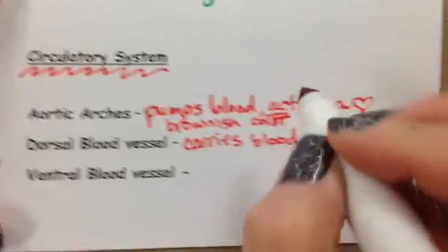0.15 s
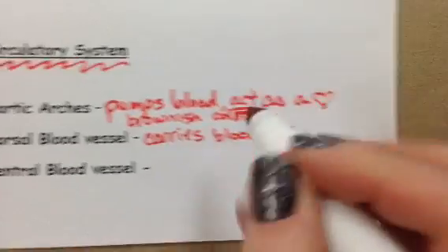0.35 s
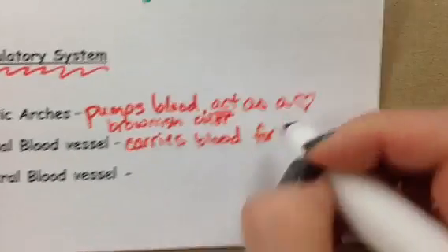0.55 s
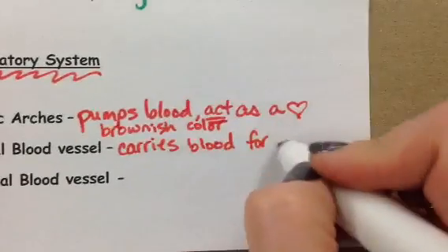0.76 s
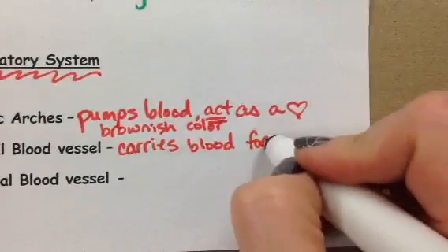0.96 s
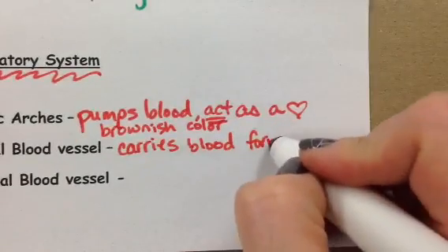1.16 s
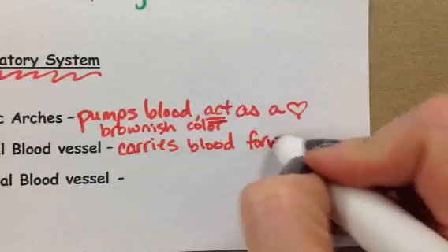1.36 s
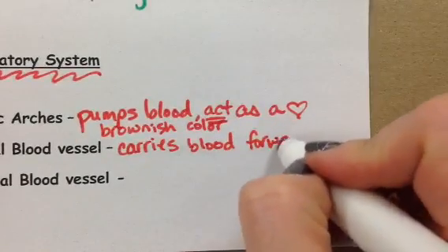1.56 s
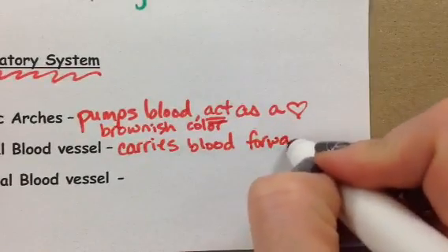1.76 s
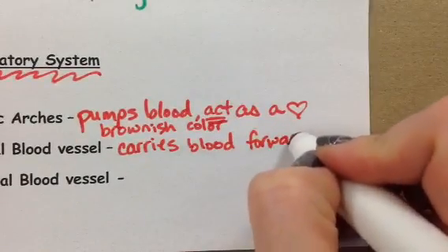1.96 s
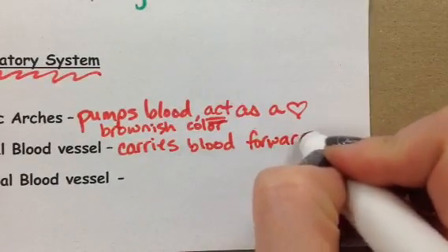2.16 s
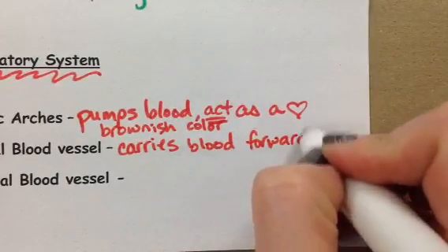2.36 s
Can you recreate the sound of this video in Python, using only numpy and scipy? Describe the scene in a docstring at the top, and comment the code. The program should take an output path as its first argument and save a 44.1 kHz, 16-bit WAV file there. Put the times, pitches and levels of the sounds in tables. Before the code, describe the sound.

Marker writing on paper, softly scratchy and chattering, following a swish of the shifted sheet.

```python
"""A felt marker writes on a sheet of paper on a desk, close to a mono microphone in a quiet room.
Its nib hisses over the fibres where it moves fast and chatters at the pen's own resonance where it
lands, turns or stops. Before the writing, a hand shifts the sheet in one long, two-part swish; the
paper ticks, drums and catches, and a finger taps the desk. Ventilation and a faint hum lie beneath."""
import sys
import numpy as np
from scipy import signal
from scipy.fft import rfft, irfft
from scipy.io import wavfile
from scipy.ndimage import uniform_filter1d

SR = 44100
rng = np.random.default_rng(int(sys.argv[2]) if len(sys.argv) > 2 else 0)


def pcm_store(signal):
    """Save signal as 16-bit PCM."""
    levels = np.round(np.clip(np.atleast_2d(signal), -1, 1) * 32767)
    wavfile.write(sys.argv[1], SR, levels.astype(np.int16).T)


N = 110250
TIME = np.arange(N) / SR


def undb(db):
    """Decibels to gain."""
    return 10 ** (np.asarray(db) / 20)


def unit(x):
    """Scale to rms 1."""
    return x / np.sqrt(np.mean(x ** 2) + 1e-20)


def drift(rate_hz):
    """Smooth random modulation with a spread near 1."""
    hold = max(int(SR / rate_hz), 2)
    steps = rng.standard_normal(N)[np.arange(N) // hold]
    return 1.33 * uniform_filter1d(uniform_filter1d(steps, hold), hold)


def eq(x, curve, modes=(), size=2048):
    """Minimum-phase EQ from a curve (f/Hz, level/dB) plus resonances (f/Hz, width/Hz, level/dB)."""
    f = np.fft.rfftfreq(size, 1 / SR) + 1
    curve_hz, curve_db = np.array(curve).T
    db = np.interp(np.log(f), np.log(curve_hz), curve_db)
    for hz, width, peak in modes:
        db += peak / (1 + (2 * (f - hz) / width) ** 2)
    cepstrum = irfft(np.log(undb(db)))
    cepstrum[1:size // 2] *= 2
    cepstrum[size // 2 + 1:] = 0
    return signal.fftconvolve(x, irfft(np.exp(rfft(cepstrum))))[:N]


def butter(x, hz, kind, order=6):
    """Low-pass or high-pass."""
    return signal.sosfilt(signal.butter(order, hz, kind, fs=SR, output="sos"), x)


def bass(x, hz):
    """The band below hz, without delay."""
    forward = butter(x, hz, "low", order=3)
    return butter(forward[::-1], hz, "low", order=3)[::-1]


def grains(per_s=14000, spread_db=1.5):
    """Paper fibres snap free in dense, uneven clicks; the defaults are the sliding sheet's grain."""
    clicks = (rng.random(N) < per_s / SR) * rng.choice([-1, 1], N)
    return clicks * undb(spread_db * np.minimum(rng.exponential(size=N), 2 * np.e))


def gesture(start, length, rise_share=.29, fall_share=.3):
    """Envelope of one movement: it speeds up, holds and slows down."""
    progress = (TIME - start) / length
    ramp = np.minimum(progress / rise_share, (1 - progress) / fall_share)
    return np.sin(np.pi / 2 * np.clip(ramp, 0, 1))


def gestures(cues):
    """Envelope of a list of movements (t/s, length/s, level/dB)."""
    return sum(undb(db) * gesture(start, length) for start, length, db in cues)


def hits(cues, one_shot):
    """Trigger a peak-normalised one-shot at each cue (t/s, level/dB)."""
    triggers = np.zeros(N)
    for start, db in cues:
        triggers[int(start * SR)] += undb(db)
    return signal.fftconvolve(triggers, one_shot / np.abs(one_shot).max())[:N]


# tone of the room's noise bed (f/Hz, level/dB)
ROOM_EQ = [(30, -41), (55, -36.5), (90, -18), (150, -6.5), (215, 0), (290, -9), (370, -12), (480, -18.5),
           (750, -17.5), (1170, -17.5), (1600, -20.5), (3000, -24.5), (8000, -24.5), (15000, -25.5)]
# hum partials (f/Hz, level/dB)
HUM_PARTIALS = [(120, -82), (199, -72.5), (238, -74)]


def room_tone():
    """Low ventilation noise, a wavering hum and microphone hiss."""
    hum = 0
    for hz, db in HUM_PARTIALS:
        level = undb(db + 2 * drift(11.57))
        hum += level * np.sqrt(2) * np.sin(2 * np.pi * hz * TIME + .7 * drift(9.7))
    return hum + undb(-64) * unit(eq(rng.standard_normal(N), ROOM_EQ, size=8192))


# soft rubs of the resting hand (t/s, length/s, level/dB)
RUB_CUES = [(0.001, 0.13, -62.5), (.835, 0.038, -64), (.895, .02, -69), (2.14, .14, -71)]
# tone of skin on paper (f/Hz, level/dB)
SKIN_EQ = [(300, -20), (1000, 0), (2500, -3), (6000, -1), (14000, 0)]


def hand_rubs():
    """The resting hand creeps over the paper with a faint, grainy hiss."""
    return gestures(RUB_CUES) * unit(eq(grains(per_s=8700, spread_db=-1.5), SKIN_EQ))


# low flutters of the sheet (t/s, length/s, level/dB)
DRUM_CUES = [(.05, 0.029, -59.5), (.105, 0.031, -63), (.34, 0.038, -63), (.435, 0.046, -54),
             (.51, 0.077, -55.5)]


def sheet_drumming(hz=249.4, width_hz=89):
    """The sheet drums on the desk: friction grain through one low resonance."""
    resonance = signal.iirpeak(hz, hz / width_hz, fs=SR)
    drum = signal.lfilter(*resonance, signal.lfilter(*resonance, grains()))
    return gestures(DRUM_CUES) * unit(drum)


# dry paper ticks (t/s, level/dB)
TICK_CUES = [(.0548, -37.5), (.0983, -50), (.1196, -43), (.155, -50), (.171, -41)]
# their crisp tone (f/Hz, level/dB)
TICK_EQ = [(500, -5), (3000, -17.5), (5000, -12.5), (9500, -2.5), (15000, -6)]


def paper_ticks(decay_s=.0009):
    """The sheet ticks under the hand: a click with a tiny rustling tail."""
    rustle = .45 * rng.standard_normal(N) * np.exp(-TIME / decay_s)
    return hits(TICK_CUES, eq(signal.unit_impulse(N) + rustle, TICK_EQ))


# friction automation of the swish (t/s, level/dB, bass shelf/dB, treble shelf/dB)
SWISH_CURVE = [(0.121,-66.5,5,0.5),(.18,-56,-0.5,-1.5),(.235,-45.5,-3,-2),(.33,-45,-2,-1),(.36,-40,-0.5,-1),(0.382,-35.5,-1.5,-0.5),(.408,-41,-6.5,1),(.43,-39.5,-4,0.5),(.458,-41,-0.5,1.5),(.51,-42.5,-0.5,-5),(.545,-52.5,7,0),(.59,-43.5,4,-2),(.65,-39.5,0,-3),(.685,-42,1,-5.5),(0.719,-55.5,-2,-0.5),(.77,-61,5,2.5),(.81,-73,4,-1)]
# how hard the sheet is pressed on the desk (t/s, share/0-1)
PRESSURE_CURVE = [(.2, 0.09), (.33, 0.02), (.38, 0.78), (.44, 0.93), (.55, 0.97), (.68, 0.88), (.73, 0.43)]
# tone of the lightly brushed sheet (f/Hz, level/dB)
LIGHT_EQ = [(50, -45), (110, -40), (230, -7), (470, -9), (900, -1), (1400, 1), (2200, -4), (4000, -4),
            (7000, -7)]
# tone of the pressed sheet under its resonances (f/Hz, level/dB)
PRESSED_EQ = [(50, -33), (110, -46), (250, 1.5), (470, -6.5), (750, 3), (1300, 2.5), (1950, -5.5),
              (3000, -1.5), (5000, -1.5), (7000, -3)]
# resonances of the pressed sheet (f/Hz, width/Hz, level/dB)
PRESSED_MODES = [(1020, 160, -2), (1670, 160, 7), (2280, 360, 12.5), (3245, 700, 7), (4880, 1030, 7.5),
                 (7440, 970, 4.5)]
# airy top from the finest fibres (f/Hz, level/dB)
FIBRE_EQ = [(7000, 2), (8000, 1), (9700, 0.5), (12000, 0), (15000, -3.5)]


def sheet_swish(crossover_hz=7300, flutter_db=.4):
    """The sliding sheet hisses; pressure crossfades it from a light brush to a resonant scrape."""
    times, level_db, bass_db, treble_db = np.array(SWISH_CURVE).T
    level = undb(np.interp(TIME, times, level_db, left=-120, right=-120) + flutter_db * drift(119.7))
    pressure = np.interp(TIME, *np.array(PRESSURE_CURVE).T)
    light = undb(-2.5) * unit(butter(eq(grains(), LIGHT_EQ), crossover_hz, "low"))
    pressed = unit(butter(eq(grains(), PRESSED_EQ, PRESSED_MODES), crossover_hz, "low"))
    fibres = undb(-2) * unit(butter(eq(grains(), FIBRE_EQ), crossover_hz, "high"))
    hiss = np.sqrt(1 - pressure) * light + np.sqrt(pressure) * pressed + fibres
    bass_shelf = (undb(np.interp(TIME, times, bass_db)) - 1) * bass(hiss, hz=1890)
    treble_shelf = (undb(np.interp(TIME, times, treble_db)) - 1) * (hiss - bass(hiss, hz=4140))
    return level * (hiss + bass_shelf + treble_shelf)


# fingertip on the desk (t/s, level/dB)
TAP_CUES = [(.1485, -45)]


def finger_tap(hz=435, t60_s=.019):
    """A finger taps the desk, which gives one short, damped ring."""
    ring = np.sin(2 * np.pi * hz * TIME) * undb(-60 * TIME / t60_s)
    return hits(TAP_CUES, butter(ring, hz / 2, "high", order=2))


# snags of the sheet (t/s, length/s, level/dB)
CATCH_CUES = [(.1665, 0.0049, -49), (.366, 0.0186, -40.5), (.44, 0.0086, -49), (.745, 0.05, -64),
              (.979, 0.0042, -61.5)]
# their nasal tone (f/Hz, level/dB)
CATCH_EQ = [(60, -45), (150, -41), (400, -17), (650, -4), (950, 3), (1350, 11.5), (2000, -10), (4000, -18),
            (12000, -4.5)]


def sheet_catches():
    """The sheet catches and jerks free in short rasps."""
    return gestures(CATCH_CUES) * unit(eq(grains(), CATCH_EQ))


# fast pen strokes (t/s, length/s, level/dB, treble shelf/dB)
STROKE_CUES = [(1.087, 0.045, -58, -5), (1.167, 0.048, -58.5, 2.5), (1.298, 0.082, -63, -1.5),
               (1.556, 0.079, -59.5, 0), (1.653, 0.061, -58.5, 0.5), (1.759, 0.011, -56, -8),
               (1.771, 0.042, -62.5, -3), (1.987, 0.041, -63, -6), (2.019, 0.018, -56.5, 0),
               (2.054, 0.037, -69.5, 2), (2.269, 0.058, -58.5, -0.5), (2.354, 0.058, -61, 4),
               (2.405, 0.048, -67.5, 10.5), (2.426, 0.038, -56.5, -1)]
# tone of felt on paper (f/Hz, level/dB)
NIB_EQ = [(300, -29), (700, -13), (1250, 4.5), (1800, 0), (2350, 6.5), (2750, -2.5), (3300, 1), (3750, -5),
          (4300, 1.5), (4800, -4.5), (5700, 3.5), (6800, -1.5), (7800, -11.5), (9300, -3), (11500, -15),
          (15000, -17)]


def nib_hiss(crossover_hz=5550):
    """The fast felt nib combs the paper fibres; the treble opens fully only at full speed."""
    hiss = unit(eq(grains(per_s=6000, spread_db=2.5), NIB_EQ))
    body = bass(hiss, crossover_hz)
    out = np.zeros(N)
    for start, length, db, treble_db in STROKE_CUES:
        speed = gesture(start, length)
        treble = undb(treble_db) * speed ** 1.6 * (hiss - body)
        out += undb(db) * speed * (body + treble)
    return out


# chatter bursts of the slow nib (t/s, length/s, level/dB)
CHATTER_CUES = [(1.089, .022, -47), (1.104, 0.038, -57), (1.135, 0.037, -67.5), (1.182, .034, -63),
                (1.27, 0.031, -63.5), (1.298, 0.03, -56), (1.347, .024, -54.5), (1.368, 0.036, -61.5),
                (1.53, 0.071, -63), (1.564, 0.016, -56.5), (1.585, 0.057, -66), (1.622, 0.047, -56.5),
                (1.688, 0.031, -59), (1.759, 0.021, -51), (1.773, 0.033, -59.5), (1.905, 0.025, -65),
                (1.987, 0.052, -52.5), (2.06, 0.037, -63.5), (2.312, .062, -58), (2.448, 0.0135, -53.5)]
# knocks of the nib on the paper (t/s, level/dB)
KNOCK_CUES = [(1.0915, -40), (1.1005, -39), (1.358, -47), (1.569, -45), (1.765, -47), (2.452, -43)]
# tone of the pen's body (f/Hz, level/dB)
PEN_EQ = [(300, -30), (500, -40), (620, -14), (730, -22), (950, -9.5), (1100, -4.5), (1240, -1.5),
          (1430, -14), (1600, -8.5), (2050, -18), (2400, -24), (3000, -26.5), (6000, -26), (12000, -50)]
# the barrel's main ring (f/Hz, width/Hz, level/dB)
BARREL_MODES = [(1250, 380, 4.5)]


def nib_chatter(slips_per_s=520, jitter=.4, spread_db=1):
    """The slow nib sticks and slips unevenly; each slip and knock rings the pen."""
    gap, size = rng.standard_normal((4000, 2)).T
    onsets = (np.cumsum(np.exp(jitter * gap)) * SR / slips_per_s).astype(int)
    inside = onsets < N
    slips = np.bincount(onsets[inside], undb(spread_db * size[inside]), N)
    chatter = gestures(CHATTER_CUES) * unit(eq(slips - slips.mean(), PEN_EQ, BARREL_MODES))
    return chatter + hits(KNOCK_CUES, eq(signal.unit_impulse(N), PEN_EQ, BARREL_MODES))


def room_echo(x, t60_s=.061, predelay_s=.003):
    """The room's reflections blur into a very short tail."""
    tail = rng.standard_normal(N) * undb(-60 * TIME / t60_s) * (TIME > predelay_s)
    return signal.fftconvolve(x, tail / np.linalg.norm(tail))[:N]


def scene():
    """The desk sounds and their echo over the room tone, the same in both channels."""
    desk = hand_rubs() + sheet_drumming() + paper_ticks() + sheet_swish() + finger_tap()
    desk += sheet_catches() + nib_hiss() + nib_chatter()
    mono = room_tone() + desk + undb(-10.5) * room_echo(desk)
    return np.array([mono, mono])


def record(dry, top_hz=15450):
    """A steep low-pass trims the very top."""
    return signal.sosfilt(signal.ellip(12, .1, 80, top_hz, fs=SR, output="sos"), dry)


dry = scene()
out = record(dry)
pcm_store(out)
```